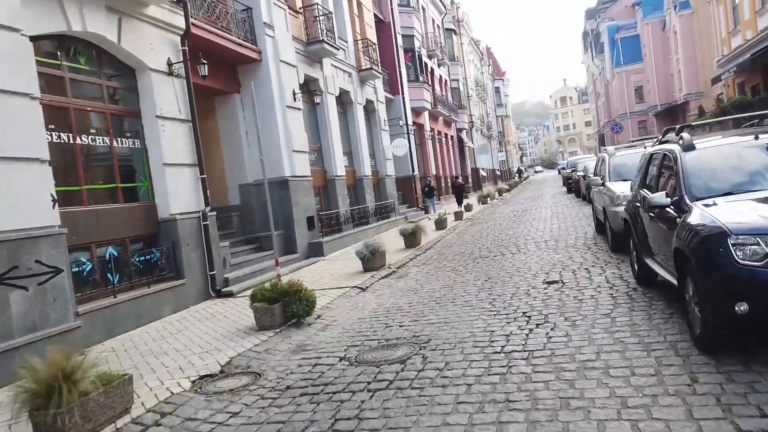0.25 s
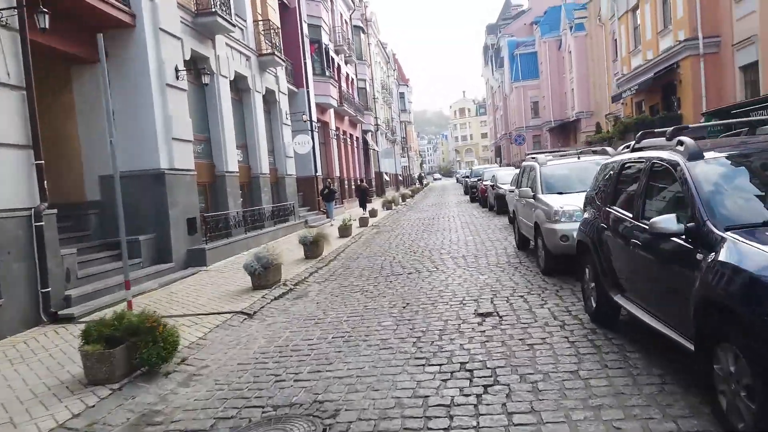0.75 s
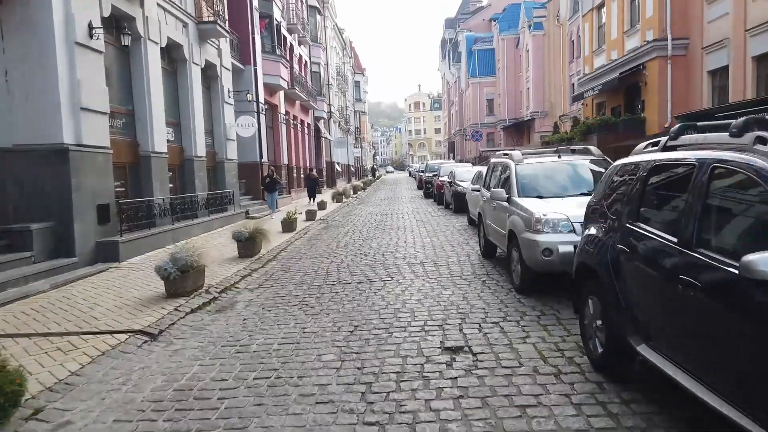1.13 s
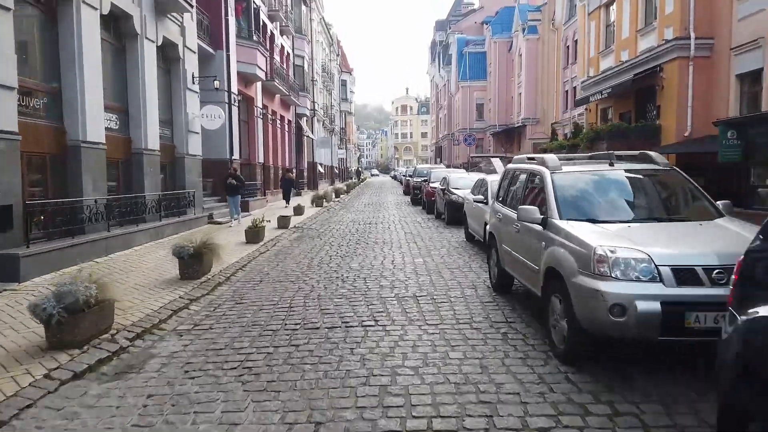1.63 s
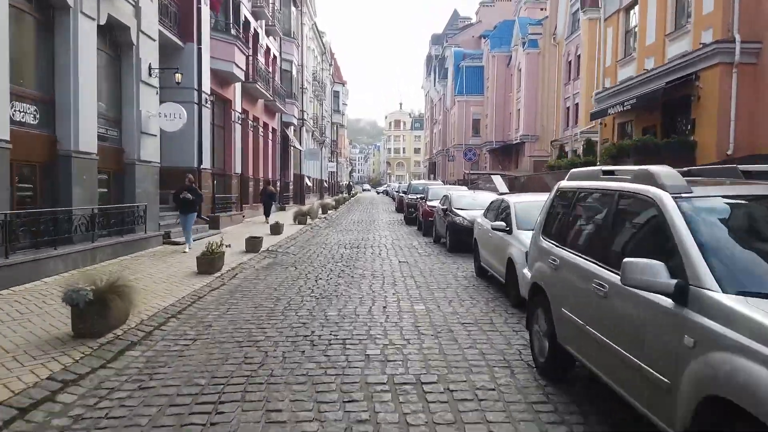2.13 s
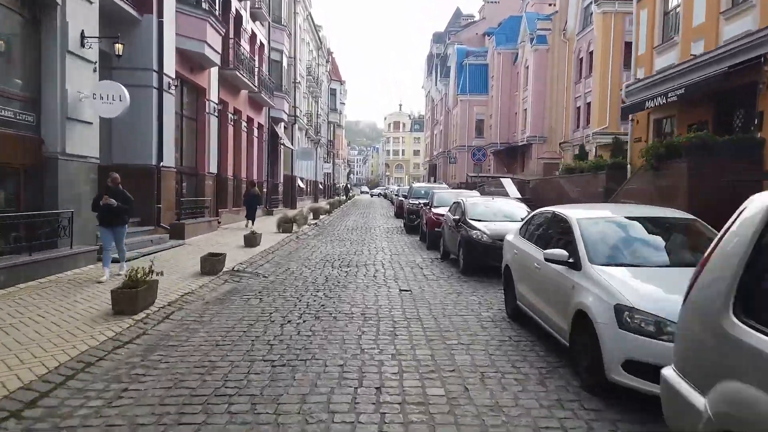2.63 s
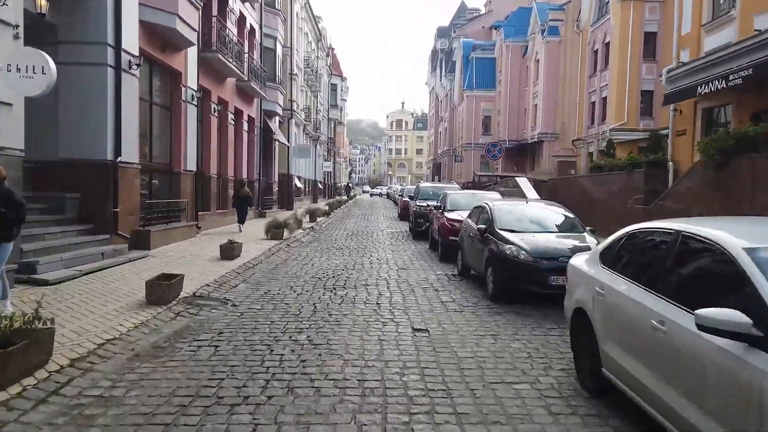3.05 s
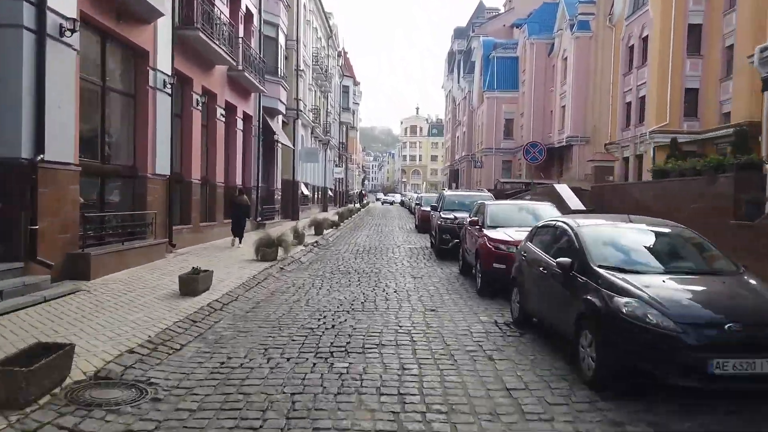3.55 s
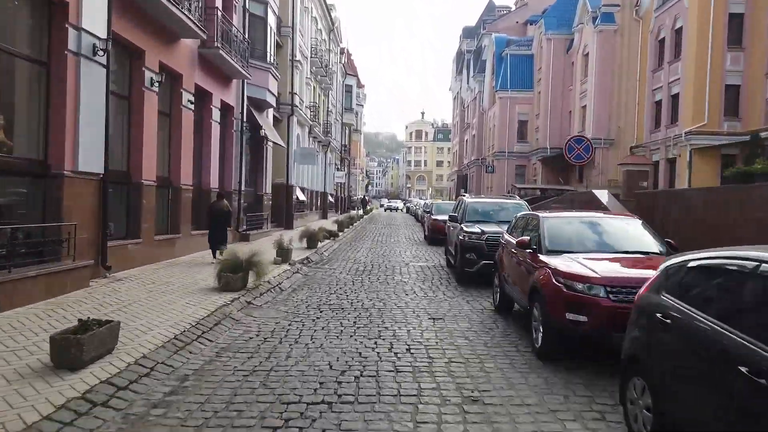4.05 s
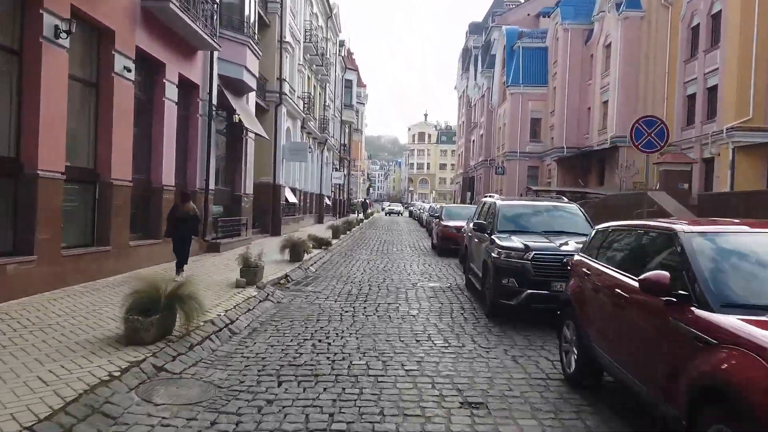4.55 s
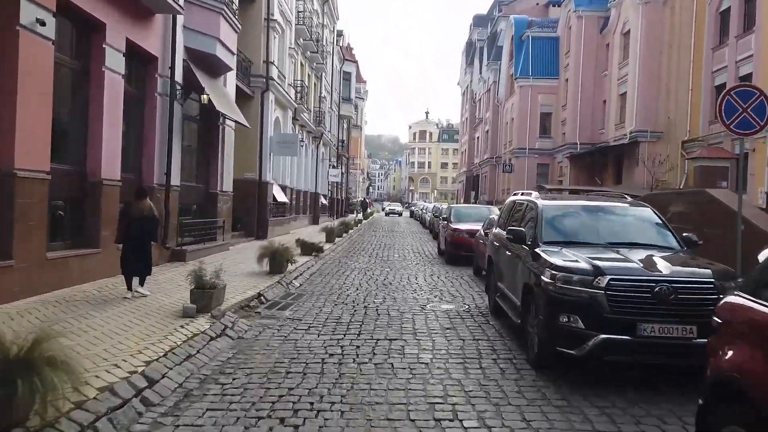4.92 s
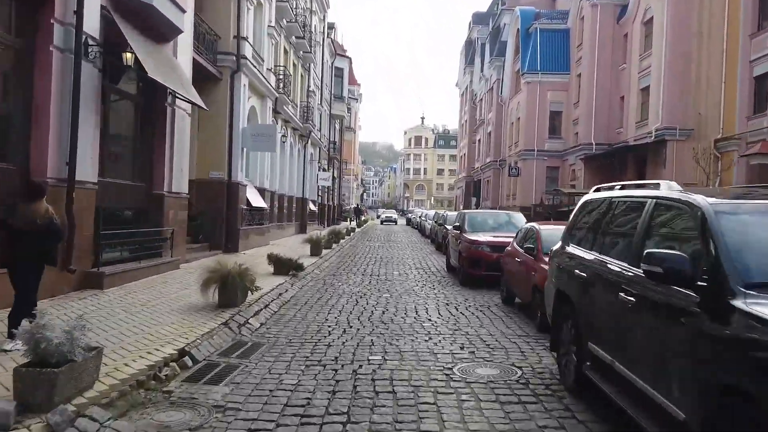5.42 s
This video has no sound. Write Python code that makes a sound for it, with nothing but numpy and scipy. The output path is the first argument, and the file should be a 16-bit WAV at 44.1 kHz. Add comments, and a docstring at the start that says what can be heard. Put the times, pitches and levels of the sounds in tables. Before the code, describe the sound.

An electric wheel speeds up along a cobbled street, heard close from the rider's hand. At first there is mostly low wind buffeting, dull thuds and sparse knocks; then the hollow tyre and shell drumming thickens into a roar. A very high, fluttering motor whine grows, with gritty hiss, bright rattles and buzzing plastic. The street itself is only a faint hush.

```python
"""Electric unicycle on cobbles

It gathers speed along a cobbled street, heard from the rider's hand. Pushes at the stone joints ring
shell and panel modes; filtered noise makes tread hiss, grit, sand, thuds and rattles. The motor is
resonant noise round its switching rate, with side tones that fan out with speed, an octave and a sizzle.
Low noise on each port buffets the microphone over tyre rumble and a faint street hush."""
import sys
import numpy as np
from scipy import signal
from scipy.fft import rfft, irfft
from scipy.io import wavfile
from scipy.ndimage import uniform_filter1d

SR = 44100
rng = np.random.default_rng(int(sys.argv[2]) if len(sys.argv) > 2 else 0)


def wrap_up_sound(samples):
    """Save the sound to the file named by the first command line argument, as 16-bit audio."""
    columns = np.atleast_2d(samples).T
    # keep every value between -1 and 1, then stretch to whole-number steps
    tamed = np.clip(columns, -1, 1)
    steps = np.round(tamed * 32767).astype(np.int16)
    wavfile.write(sys.argv[1], SR, steps)


N = 250929
TIME = np.arange(N) / SR
FREQ = np.arange(N // 2 + 1) * SR / N
PORT_LAG_SAMPLES, WHINE_LAG_SAMPLES, TRIM_LAG_SAMPLES = 4, 4.3, 5.1  # left port hears these late

# tyre and shell modes: f/Hz, stage width/Hz, relative level/dB, rise/dB per doubling of speed
SHELL_MODES = [(589, 70, -12.5, -18), (684.5, 162, 3.5, -8), (779, 122, 2.5, -4), (880, 318, 5, 2),
               (1103, 465, 1, 15), (1414, 380, -4, 21)]


def undb(db):
    """Decibels to gain."""
    return 10 ** (np.asarray(db) / 20)


def unit(x):
    """Scale to rms 1."""
    return x / np.sqrt(np.mean(x ** 2))


def noise():
    """Three independent noises: one common to both ports, one for each port alone."""
    return rng.standard_normal((3, N))


def walk(rate_hz, count=1):
    """Smooth random curves of rms 1: white noise under a Gaussian low-pass."""
    spectrum = rfft(rng.standard_normal((count, N)))
    return unit(irfft(spectrum * np.exp(-(FREQ / rate_hz) ** 2), N))


def curve(rows):
    """Rows (t/s, value) joined by straight lines."""
    return np.interp(TIME, *np.transpose(rows))


def bell(distance, half_width):
    """Gaussian bump, 1 at distance zero and 1/e at the half width."""
    return np.exp(-(distance / half_width) ** 2)


def burst(start_s, length_s, attack_s, release_s):
    """Straight attack, hold, then exponential release from the end of the length."""
    age_s = TIME - start_s
    return np.clip(age_s / attack_s, 0, 1) * np.exp(-np.maximum(age_s - length_s, 0) / release_s)


def doublings(speed_hz):
    """Octaves above the mean speed."""
    return np.log2(speed_hz / np.mean(speed_hz))


def colour(x, points):
    """Filter by (f/Hz, gain/dB) points joined on a log frequency axis."""
    hz, db = np.transpose(points)
    return irfft(rfft(x) * undb(np.interp(np.log(FREQ + 1), np.log(hz), db)), N)


def ring(x, hz, width_hz):
    """Two identical resonators in series."""
    damping = 1j * FREQ * width_hz
    return irfft(rfft(x) * (damping / (hz ** 2 - FREQ ** 2 + damping)) ** 2, N)


def moving_ring(hz, width_hz):
    """Narrow-band noise of rms 1 on a carrier that follows the curve hz."""
    lowpass = signal.butter(2, width_hz / 2, fs=SR, output="sos")
    in_phase, quadrature = signal.sosfilt(lowpass, rng.standard_normal((2, 3, N)))
    phase = 2 * np.pi * np.cumsum(hz) / SR
    return unit(in_phase * np.cos(phase) + quadrature * np.sin(phase))


def sing(modes):
    """Modes (f/Hz, width/Hz, level/dB), each shaken by its own noise."""
    return sum(undb(db) * ring(noise(), hz, width_hz) for hz, width_hz, db in modes)


def even(x, span_s=0.35):
    """Hold the slow level at rms 1 and keep the quick grain."""
    power = np.mean(np.atleast_2d(x) ** 2, axis=0)
    size = int(span_s * SR / 2)
    slow_power = uniform_filter1d(uniform_filter1d(power, size), size)
    return x / np.sqrt(slow_power + 1e-12)


def ports(x, direct, lag=PORT_LAG_SAMPLES):
    """Direct share of the power, late by lag samples at the left; the scattered rest differs by port."""
    late = np.sinc(np.arange(-12, 13) - lag) * signal.windows.tukey(25)  # fractional delay
    common = np.array([np.convolve(x[0], late, "same"), x[0]])
    return np.sqrt(direct) * common + np.sqrt(1 - direct) * x[1:]


def joints(speed_hz, per_cycle, uneven, scatter_db, contact_s):
    """Contact force of rms 1: a soft push at each joint between uneven stones, more often with speed."""
    gap, size = rng.standard_normal((900, 2)).T
    stones_passed = np.cumsum(speed_hz) * per_cycle / SR
    at = np.searchsorted(stones_passed, np.cumsum(np.exp(uneven * gap)))
    pushes = np.bincount(at, undb(scatter_db * np.tanh(size)), N + 1)[:N]
    return unit(irfft(rfft(pushes) * np.exp(-(FREQ * contact_s) ** 2), N))


def tyre(speed_hz, coarse_db, drum_db):
    """Joint slaps drive shell and panel; the tread hisses and scuffs on the stone."""
    slaps = joints(speed_hz, per_cycle=.33, uneven=.3, scatter_db=3, contact_s=.005)
    body = shell(slaps, speed_hz, drum_db) + panel(slaps, speed_hz, coarse_db) + panel_bouts(slaps)
    tread = tread_hiss(slaps, coarse_db) + scuffs()
    return ports(body, direct=0.25) + ports(tread, direct=0.19)


def shell(slaps, speed_hz, drum_db):
    """Slaps and steady scrubbing ring the shell, brighter with speed and harder drumming."""
    patter_db, doublings_per_drum_db = -49, 0.033
    # runs of rough stones that make the shell surge:
    # t/s, half length/s, rise/dB, brightening/doublings of speed
    surge_rows = [(0.683, 0.018, 5.5, -0.033), (0.937, 0.021, 4.5, 0.62), (0.975, .016, 4, -0.25),
                  (1.206, 0.0078, 12.5, -0.46), (1.378, 0.029, 2, -0.023), (1.427, 0.011, 1, 0.36),
                  (1.61, .06, 2.5, .2), (1.696, 0.011, 0.5, 0.14), (1.849, 0.028, -0.5, 0.2),
                  (2.068, .02, 2.5, 0.46), (2.192, 0.026, 7.5, -.1), (2.334, 0.026, 7, 0.045),
                  (2.592, 0.026, 5.5, 0.25), (2.683, 0.028, 2.5, -0.19), (2.863, 0.029, 3.5, 0)]
    surge_db = sum(db * bell(TIME - s, half_s) for s, half_s, db, lift in surge_rows)
    surge_bright = sum(lift * bell(TIME - s, half_s) for s, half_s, db, lift in surge_rows)
    octaves = doublings(speed_hz)
    force = slaps + 2.74 * undb(7.9 * octaves)  # stones blur into a roar with speed
    bright = octaves + doublings_per_drum_db * drum_db + surge_bright
    modes = 0
    for hz, width_hz, db, rise_db in SHELL_MODES:
        share = undb(db + rise_db * bright + 1.3 * walk(115))  # each mode's own random share
        modes = modes + ring(force * noise() * share, hz, width_hz)
    return even(modes, span_s=0.078) * undb(patter_db + drum_db + surge_db)


def panel(slaps, speed_hz, coarse_db):
    """Stiffer panel modes buzz with the slaps, more on coarse stone and at speed."""
    buzz_db, db_per_coarse_db, db_per_doubling = -63, 0.52, 12
    # panel modes: f/Hz, stage width/Hz, relative level/dB
    panel_modes = [(1580, 540, 22), (1707, 410, 25.5), (2070, 130, 21), (3000, 2400, -28)]
    level_db = buzz_db + db_per_coarse_db * coarse_db + db_per_doubling * doublings(speed_hz)
    return even((slaps + 4) * sing(panel_modes)) * undb(level_db)


def tread_hiss(slaps, coarse_db):
    """Tread rubbing on stone: coloured noise that swells with each slap."""
    hiss_db = -57.5
    # tread colour: f/Hz, relative gain/dB
    tread_colour = [(900, 3.5), (2000, 2), (2700, 5), (3500, 5), (5000, 3), (6600, 0.5), (9000, 5.5),
                    (16000, -85)]
    hiss = colour((slaps + 5) * noise() * undb(1.7 * walk(17)), tread_colour)
    return even(hiss) * undb(hiss_db + coarse_db)


def crackle(speed_hz, coarse_db):
    """Grains of sand snap under the tread: short random pushes gate coloured noise."""
    crackle_db = -62.5
    # colour of snapping sand: f/Hz, relative gain/dB
    sand_colour = [(500, -17), (1200, 2.5), (2600, -0.5), (4000, -10), (6000, -11), (10000, -17),
                   (14000, -7), (16000, -18)]
    snaps = np.array([joints(speed_hz, per_cycle=.9, uneven=.8, scatter_db=8, contact_s=.0006)
                      for _ in range(3)])
    return even(ports(colour(snaps * noise(), sand_colour), direct=0.2)) * undb(crackle_db + coarse_db)


def motor(speed_hz, coarse_db):
    """Switched current sings in the housing: whine, octave, low mode and sizzle."""
    whine_db, octave_base_db, sizzle_base_db = -49, -55, -54
    # motor effort: t/s, relative level/dB
    effort_rows = [(0.0, -21.5), (0.68, -15.5), (0.91, -5.5), (1.06, -8.5), (1.23, -1.5), (1.4, -11),
                   (1.54, 4), (1.73, -4.5), (2.03, -3), (2.12, -11.5), (2.25, -2.5), (2.48, 4), (2.6, 1),
                   (2.82, 6.5), (3.05, 9), (3.3, 1), (3.68, 4), (4.11, -4.5), (4.59, 2), (5.23, -4),
                   (5.55, 2.5), (5.69, -0.5)]
    # level of the whine's octave: t/s, relative level/dB
    octave_rows = [(0, -22), (0.25, -20), (0.36, -14), (0.76, -13), (0.9, -5), (1.55, -1.5), (2.2, -5),
                   (2.42, 6), (4.3, 3.5), (4.6, 9), (4.92, -8), (5.3, -4), (5.42, 10), (5.69, 8)]
    effort_db = curve(effort_rows) + 1.68 * walk(18)  # small balance corrections
    octave_db = curve(octave_rows)
    octaves = doublings(speed_hz)
    wander = 1 + .003 * walk(12)[0]  # shared drift of the housing modes
    tones_db = -2.5 - 2.5 * octaves  # relative to the rough band
    blend = even(housing(octaves, wander)) + undb(tones_db) * side_tones(speed_hz)
    whine = even(ports(blend, direct=0.72, lag=WHINE_LAG_SAMPLES), span_s=0.16)
    sizzle_db = sizzle_base_db + 0.12 * effort_db + 0.82 * coarse_db + 0.15 * octave_db - 4 * octaves
    return (whine * undb(whine_db + effort_db) + switching_octave() * undb(octave_base_db + octave_db)
            + sizzle(wander) * undb(sizzle_db) + low_ring(wander))


def housing(octaves, wander):
    """Rough band: noise in housing modes that wander and fluctuate; the highest grows with speed."""
    # housing modes: f/Hz, width/Hz, relative level/dB, rise/dB per doubling of speed
    housing_modes = [(7570, 310, 6.5, -11), (7950, 72, 15, -14.5), (8210, 280, 10, -16.5),
                     (8420, 270, 0.5, 23)]
    return sum(moving_ring(hz * wander, width_hz) * undb(db + rise_db * octaves + 3 * walk(25))
               for hz, width_hz, db, rise_db in housing_modes)


def side_tones(speed_hz):
    """Fluttering sines offset from the switching rate by multiples of the electrical rate."""
    switch_hz = 7865
    # side tones: multiple of the electrical rate, relative level/dB
    tone_rows = [(-4, -10.5), (-2, -13), (-1, -12), (1, -7), (2, 0), (3, -10), (4, -1.5), (5, -9)]
    turn = 2 * np.pi * np.cumsum(speed_hz * (1 + .012 * walk(9)[0])) / SR
    switch = 2 * np.pi * switch_hz * TIME
    tones = 0
    for multiple, db in tone_rows:
        sine = np.sin(switch + multiple * turn + .8 * walk(16, count=3))
        tones = tones + undb(db) * sine * (1 + .9 * walk(22, count=3))
    return unit(tones)


def switching_octave():
    """Noise in narrow resonances about twice the switching rate."""
    # octave band: f/Hz, stage width/Hz, relative level/dB
    octave_modes = [(15730, 28, 0), (15680, 200, -13), (15500, 450, -24)]
    return even(ports(sing(octave_modes), direct=.65, lag=PORT_LAG_SAMPLES + 1))


def sizzle(wander):
    """Scattered fine hiss, with the light trim on the housing ringing through it."""
    trim_hz, trim_width_hz, trim_db = 10730, 820, -5.5  # trim level relative to the hiss
    # sizzle colour: f/Hz, relative gain/dB
    sizzle_colour = [(6000, -38), (9000, 1), (10000, 7.5), (10750, 2.5), (11600, 5.5), (13000, 6),
                     (14200, 4.5), (15000, -2), (16000, 9)]
    spread = even(ports(colour(noise() * undb(0.97 * walk(60)), sizzle_colour), direct=0.06))
    trim = moving_ring(trim_hz * wander, trim_width_hz) * undb(2.5 * walk(40))
    return spread + undb(trim_db) * even(ports(trim, direct=.7, lag=TRIM_LAG_SAMPLES))


def buffet(gust_db):
    """Air turbulence at the microphone: low noise, nearly independent at each port."""
    buffet_db = -40
    # buffet colour: f/Hz, relative gain/dB
    buffet_colour = [(4, -22), (10, 4), (24, 3.5), (35, -0.5), (50, -9.5), (70, -14.5), (100, -25),
                     (160, -36), (400, -61.5)]
    return even(ports(colour(noise(), buffet_colour), direct=0.054), span_s=0.2) * undb(buffet_db + gust_db)


def rumble(gust_db, drum_db):
    """Dull tyre rumble: coloured noise that rises with the gusts and slightly with the drumming."""
    rumble_db, db_per_gust_db, db_per_drum_db = -56, 0.52, 0.043
    # rumble colour: f/Hz, relative gain/dB
    rumble_colour = [(50, -2.5), (120, 0.5), (200, -2.5), (380, -4), (490, -3.5), (620, -7.5), (750, -15),
                     (950, -35), (1350, -13.5), (1900, -24.5), (4000, -44)]
    level_db = rumble_db + db_per_gust_db * gust_db + db_per_drum_db * drum_db
    return unit(ports(colour(noise(), rumble_colour), direct=0.12)) * undb(level_db)


def hush():
    """Faint street background: steady coloured noise."""
    hush_db = -60
    # hush colour: f/Hz, relative gain/dB
    hush_colour = [(40, 3), (70, 6.5), (120, -2.5), (250, -7.5), (420, -8), (600, -9.5), (950, -9),
                   (1350, -9), (1900, -14.5), (4000, -22.5)]
    return unit(ports(colour(noise(), hush_colour), direct=0.16)) * undb(hush_db)


def rattle():
    """Loose parts answer jolts with a resonant ring and a bright spray of noise."""
    attack_s, release_s, width_hz, grain_db = 0.01, 0.026, 860, 3
    # rattles: start t/s, length/s, ring level/dB, ring f/Hz, spray level/dB
    tick_rows = [(0.071, 0.0314, -68, 10510, -67), (0.512, 0.031, -66, 10810, -61),
                 (1.06, 0.0197, -66, 10740, -65), (1.585, 0.0325, -53, 10850, -61),
                 (1.869, 0.0326, -57, 10900, -64), (1.955, 0.0273, -65, 10680, -67),
                 (2.28, .05, -57, 10580, -68), (2.448, 0.069, -53.5, 10260, -61),
                 (2.68, 0.0307, -51, 10850, -54), (2.753, 0.109, -64, 10620, -72),
                 (3, 0.018, -51, 10750, -56), (3.054, 0.031, -64, 11200, -60),
                 (3.169, 0.0348, -56, 10770, -59), (3.366, 0.029, -53, 10710, -53),
                 (3.557, 0.085, -57, 11000, -66), (3.774, 0.052, -57.5, 9920, -64),
                 (4.21, 0.0167, -57, 10800, -58), (4.391, 0.036, -60, 10400, -70),
                 (5.635, 0.027, -53, 10700, -58)]
    # spray colour: f/Hz, relative gain/dB
    spray_colour = [(2000, -40), (7000, -6), (9300, -10), (11500, -9), (12500, -6), (14000, -7),
                    (15500, -19)]
    ring_gain, spray_gain = 0, 0
    for s, length_s, ring_db, hz, spray_db in tick_rows:
        envelope = burst(s, length_s, attack_s, release_s)
        ring_gain = ring_gain + undb(ring_db) * envelope
        spray_gain = spray_gain + undb(spray_db) * envelope
    pitch_hz = curve([(s + length_s, hz) for s, length_s, ring_db, hz, spray_db in tick_rows])
    ringing = ports(moving_ring(pitch_hz, width_hz), direct=.65, lag=TRIM_LAG_SAMPLES)
    spray = ports(unit(colour(noise(), spray_colour)), direct=.1)
    return (ring_gain * ringing + spray_gain * spray) * undb(grain_db * walk(200))


def scuffs():
    """Grit crunches under the tread: grainy band noise in brief swells."""
    width_hz, grain_db = 1470, -3
    # grit patches: t/s, half length/s, level/dB, centre f/Hz
    scuff_rows = [(.28, .02, -66, 3670), (1.14, 0.029, -63, 2610), (1.315, .03, -62, 2805),
                  (1.44, .02, -62, 2692), (1.615, .02, -65, 4300), (2.34, .02, -72, 2300),
                  (2.59, .02, -57, 3135), (2.865, 0.035, -56, 2340), (3.23, .05, -60, 2704),
                  (3.39, 0.015, -54, 2682), (3.53, 0.025, -64, 2660), (3.74, 0.073, -62, 4345),
                  (3.97, .03, -58, 3012), (4.36, 0.017, -72, 4600), (4.48, 0.038, -57, 2500),
                  (4.618, .018, -57, 3660)]
    swell = sum(undb(db) * bell(TIME - s, half_s) for s, half_s, db, hz in scuff_rows)
    pitch_hz = curve([(s, hz) for s, half_s, db, hz in scuff_rows])
    return swell * unit(moving_ring(pitch_hz, width_hz) * undb(grain_db * walk(110)))


def thumps():
    """The wheel drops into hollows of the paving: short dull thuds of low noise."""
    half_length_s = 0.029
    # hollows in the paving: t/s, level/dB
    thump_rows = [(.37, -45), (.475, -48), (.69, -40.5), (.81, -42), (.95, -41), (1.12, -55), (1.29, -36),
                  (1.56, -49), (1.78, -43), (2.06, -41.5), (2.19, -33.5), (2.45, -38), (2.73, -41),
                  (2.83, -41), (3.19, -35)]
    # thump colour: f/Hz, relative gain/dB
    thump_colour = [(12, -12), (28, 7.5), (50, -2), (72, -14), (100, -25), (250, -51.5)]
    swell = sum(undb(db) * bell(TIME - s, half_length_s) for s, db in thump_rows)
    return swell * even(ports(colour(noise(), thump_colour), direct=0.13), span_s=0.027)


def knocks():
    """Proud stones strike the wheel; the tyre cushions each blow and the shell modes ring."""
    contact_s = 0.00043
    # proud stones: t/s, peak level/dB
    knock_rows = [(0.39, -40.5), (0.612, -41.5), (0.762, -43), (0.858, -35.5), (0.891, -36), (1.481, -37),
                  (1.57, -36), (1.247, -41), (1.29, -33), (1.642, -38), (1.766, -40), (2.152, -35),
                  (2.205, -37), (2.505, -40), (2.587, -37), (2.679, -37), (2.781, -38), (3.096, -40),
                  (3.676, -38), (3.93, -41), (4.668, -43)]
    push = bell(TIME - contact_s, contact_s / 2)
    knock = sum(undb(db) * ring(push, hz, width_hz) for hz, width_hz, db, rise_db in SHELL_MODES)
    knock = knock / np.max(np.abs(knock))
    s, db = np.transpose(knock_rows)
    blows = np.bincount((s * SR).astype(int), undb(db), N)[:N]
    train = irfft(rfft(blows) * rfft(knock), N)
    return np.array([np.roll(train, PORT_LAG_SAMPLES), train])


def low_ring(wander):
    """The housing's low mode rings up in short spells."""
    mode_hz, width_hz = 5845, 180
    # ringing spells: t/s, half length/s, level/dB
    spell_rows = [(.47, .04, -73), (1.03, 0.086, -64), (1.15, 0.038, -60), (1.27, 0.091, -65),
                  (1.532, .035, -55), (1.92, 0.077, -65), (2.3, 0.13, -59.5), (2.495, 0.029, -58),
                  (2.93, 0.16, -60), (3.567, .04, -64), (3.72, 0.055, -58), (4.648, .1, -66)]
    swell = sum(undb(db) * bell(TIME - s, half_s) for s, half_s, db in spell_rows)
    return swell * even(ports(moving_ring(mode_hz * wander, width_hz), direct=0.8), span_s=0.08)


def panel_bouts(slaps):
    """The side panel buzzes up in bouts: band noise shaken by the slaps."""
    attack_s, release_s, width_hz = 0.026, 0.041, 450
    # buzzing bouts: start t/s, length/s, level/dB, pitch f/Hz
    bout_rows = [(1.05, .09, -59, 1596), (3.164, .1, -47, 1882), (3.3, 0.1, -51.5, 1840),
                 (3.41, .15, -47, 1800), (3.599, 0.21, -50.5, 1724), (4.422, 0.16, -55.5, 1788)]
    swell = sum(undb(db) * burst(s, length_s, attack_s, release_s) for s, length_s, db, hz in bout_rows)
    pitch_hz = curve([(s + length_s / 2, hz) for s, length_s, db, hz in bout_rows])
    return swell * even((slaps + 3.5) * moving_ring(pitch_hz, width_hz))


def scene():
    """Wheel, motor and air, all travelling with the microphone."""
    # wheel speed as the motor's electrical rate: t/s, f/Hz
    speed_rows = [(0, 42.8), (.6, 47.07), (1, 58.96), (1.5, 73.9), (2, 90.65), (2.5, 106.6), (3, 119.1),
                  (3.5, 128.1), (4, 135), (5, 141.3), (5.7, 143.3)]
    # road coarseness under the tread: t/s, relative level/dB
    coarse_rows = [(0.0, -12.5), (0.26, -8), (1.62, -1.5), (1.72, -2.5), (3.26, 3), (3.54, 0.5),
                   (3.96, 0.5), (4.18, -3), (4.59, 3.5), (5.03, -5), (5.43, 2), (5.69, -1.5)]
    # how hard the stones drum on the tyre: t/s, relative level/dB
    drum_rows = [(0, -23), (.22, -28.5), (.3, -12.5), (.41, -13), (.47, -33), (.57, -7.5), (.73, -9),
                 (.86, -0.5), (.99, 0.5), (1.04, -5), (1.24, -6.5), (1.29, 5), (1.6, 3), (1.96, 2),
                 (2.11, -4.5), (2.16, -2), (2.41, 2), (2.52, -2), (2.75, 0.5), (2.99, -3.5), (3.14, 2),
                 (5.08, -3), (5.69, -2)]
    # strength of the air on the microphone: t/s, relative level/dB
    gust_rows = [(0.0, 2), (0.8, 6.5), (2.03, 3), (2.32, 5), (2.72, 2.5), (3.12, 1.5), (4.16, -6),
                 (4.33, -5), (4.81, -8), (5.69, -6.5)]
    speed_hz, coarse_db = curve(speed_rows), curve(coarse_rows)
    drum_db, gust_db = curve(drum_rows), curve(gust_rows)
    wheel = tyre(speed_hz, coarse_db, drum_db) + crackle(speed_hz, coarse_db)
    air = buffet(gust_db) + rumble(gust_db, drum_db) + hush()
    return wheel + motor(speed_hz, coarse_db) + air + rattle() + thumps() + knocks()


def record(dry):
    """A steep elliptic low-pass cuts the top."""
    top_hz = 15800
    return signal.sosfilt(signal.ellip(14, .1, 80, top_hz, fs=SR, output="sos"), dry)


dry = scene()
out = record(dry)
wrap_up_sound(out)
```